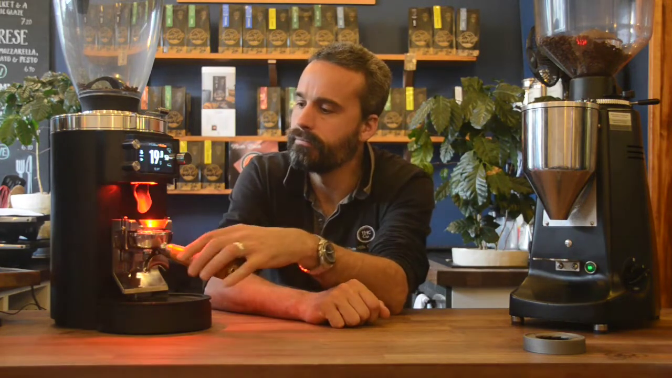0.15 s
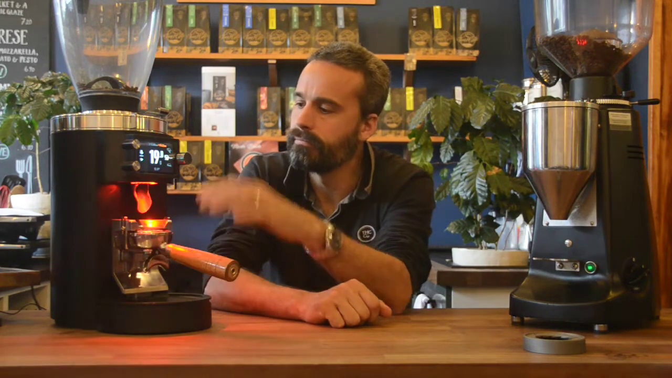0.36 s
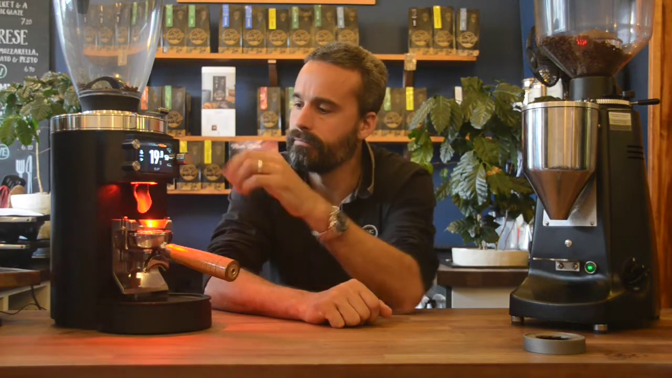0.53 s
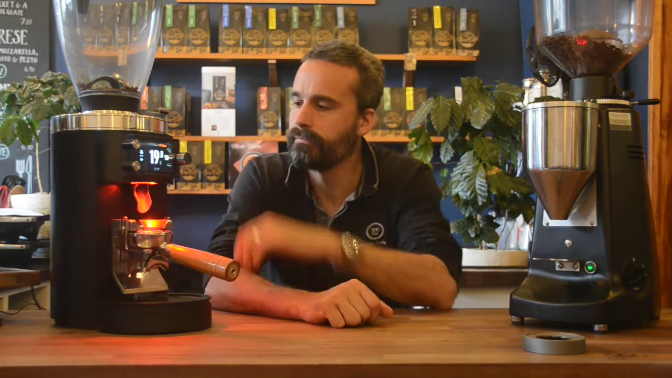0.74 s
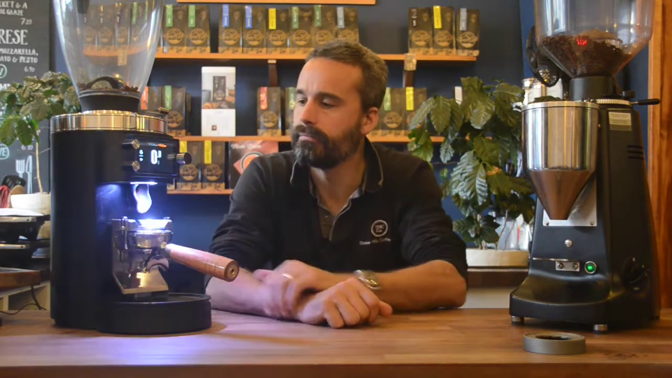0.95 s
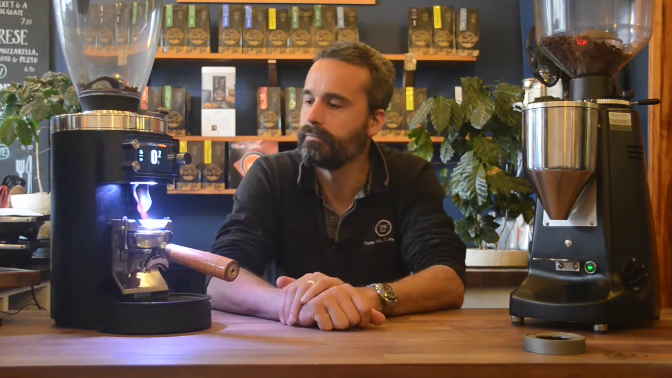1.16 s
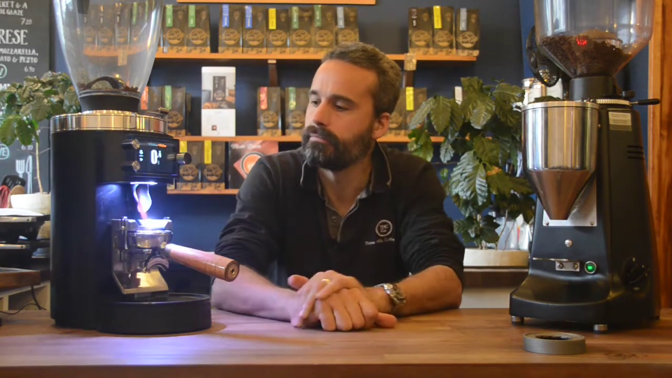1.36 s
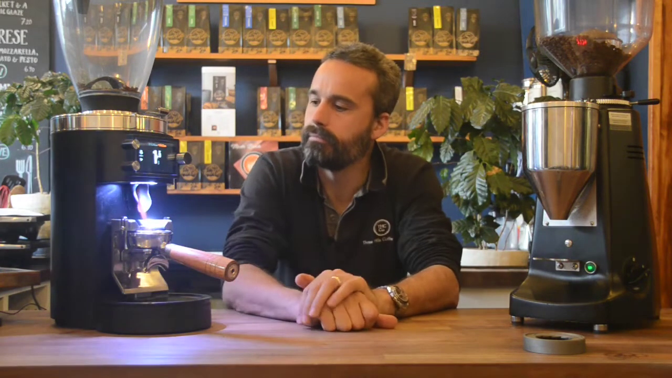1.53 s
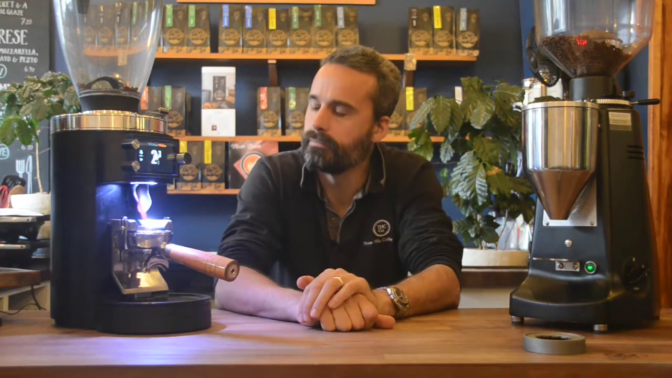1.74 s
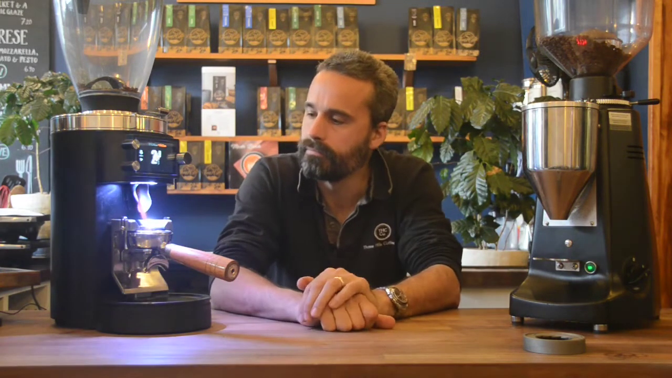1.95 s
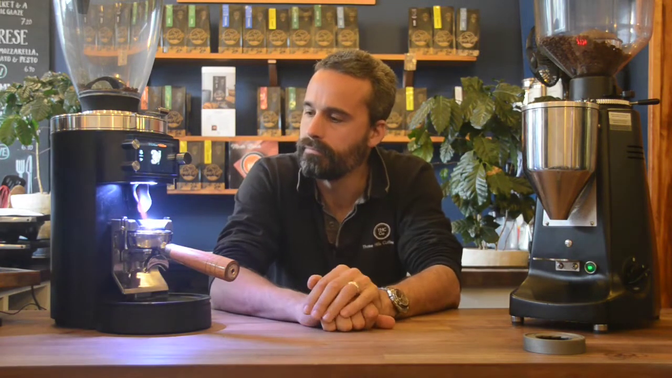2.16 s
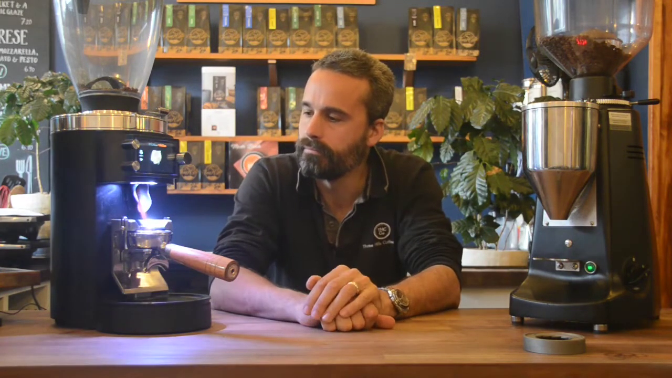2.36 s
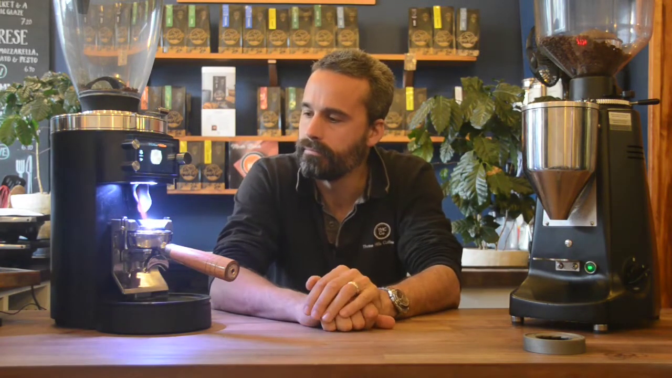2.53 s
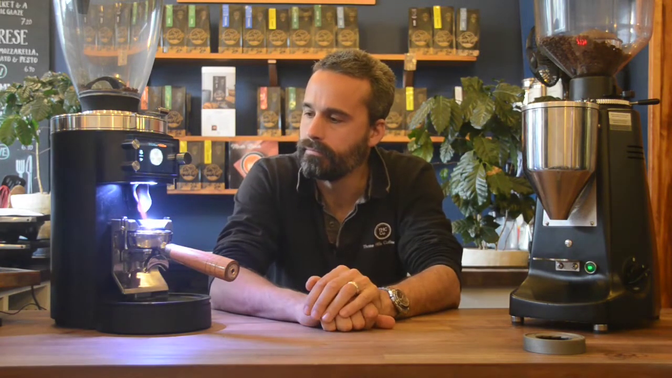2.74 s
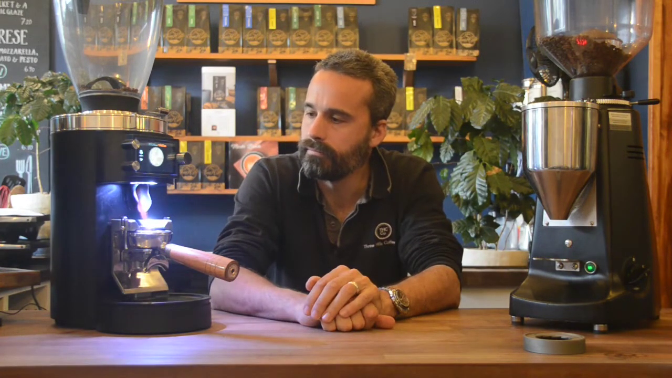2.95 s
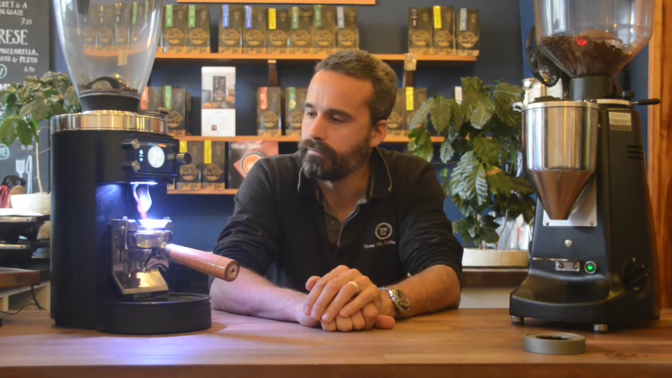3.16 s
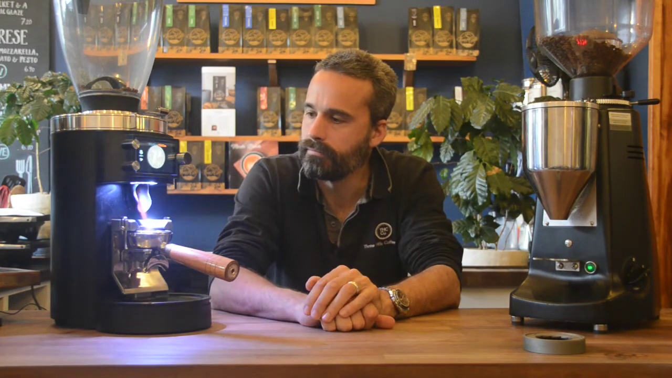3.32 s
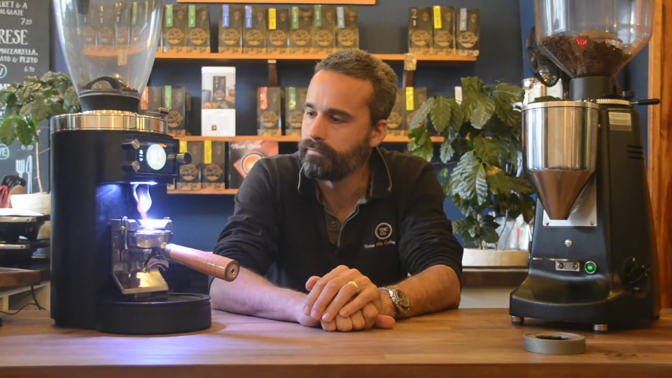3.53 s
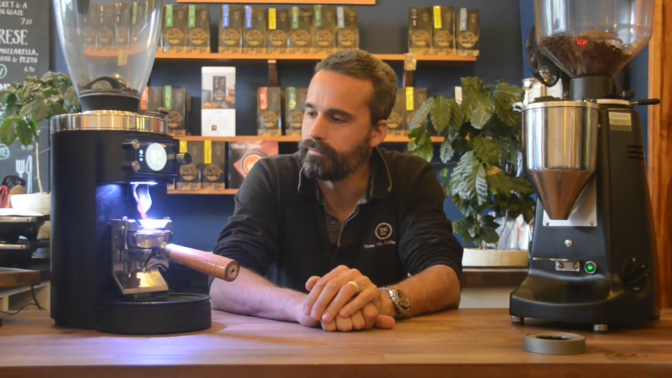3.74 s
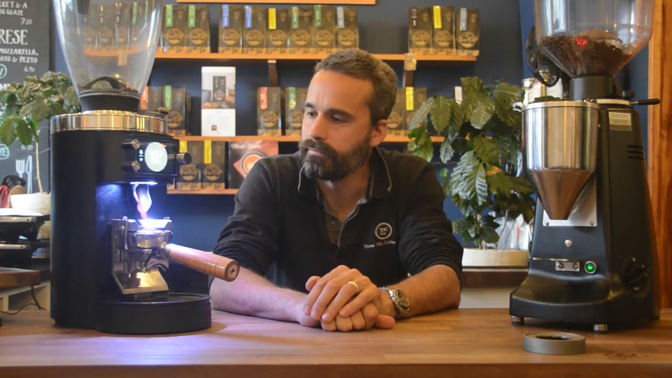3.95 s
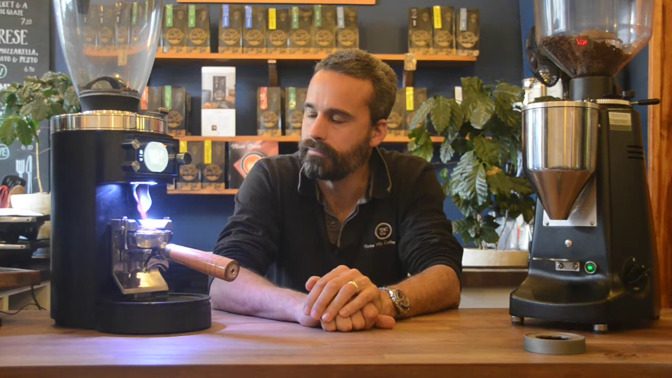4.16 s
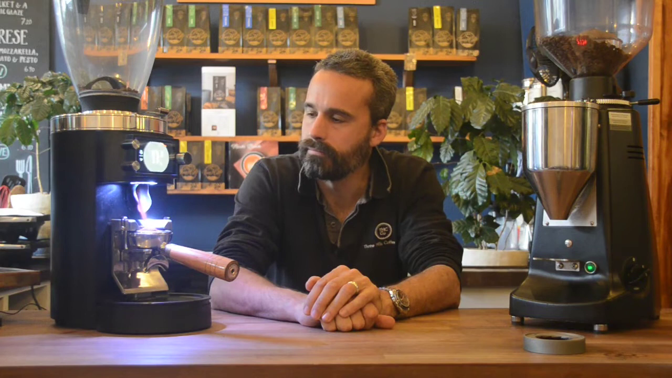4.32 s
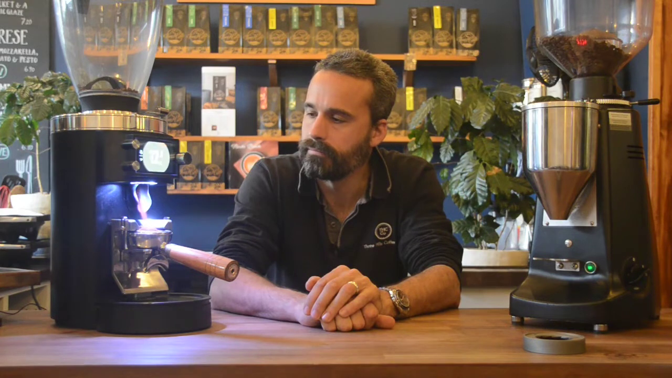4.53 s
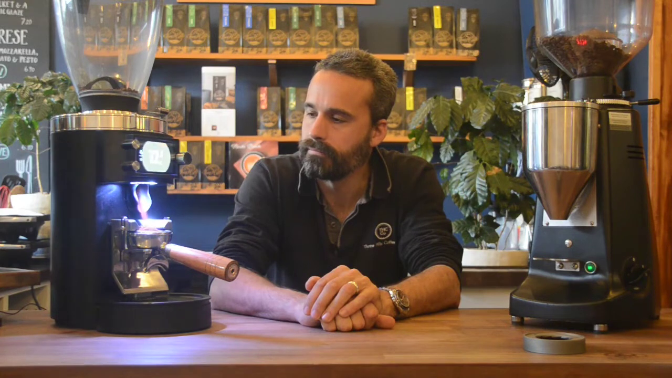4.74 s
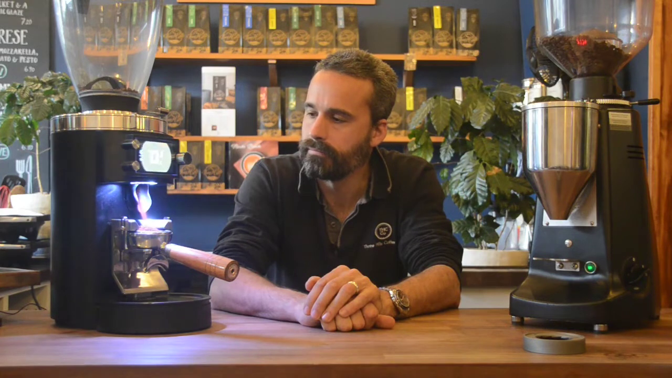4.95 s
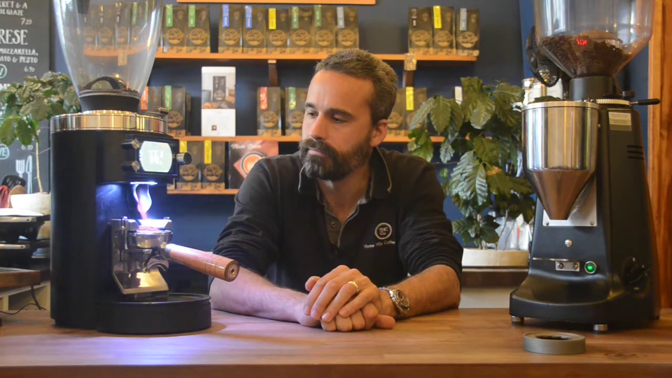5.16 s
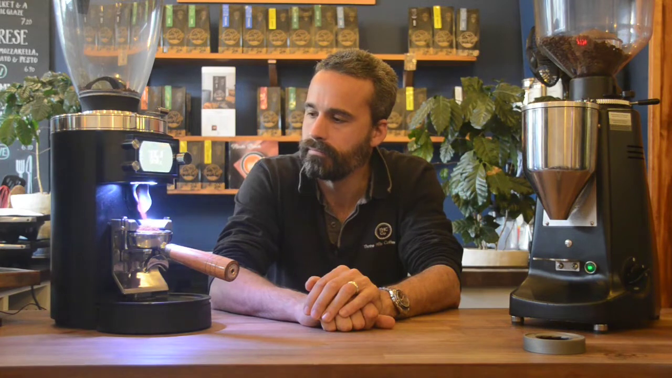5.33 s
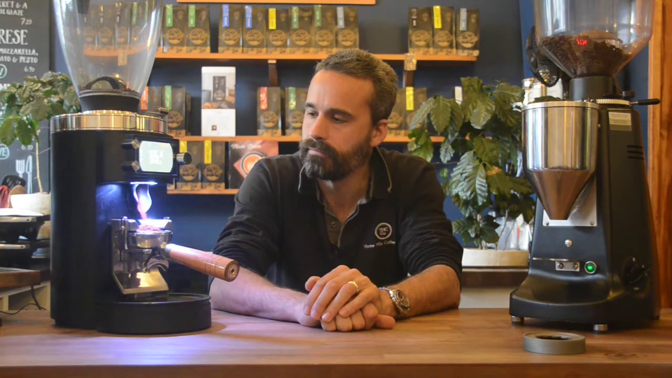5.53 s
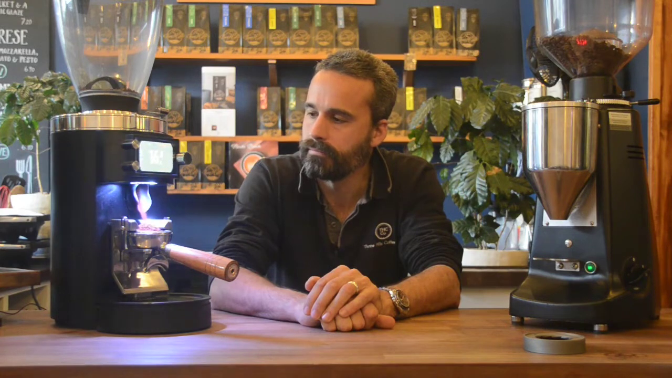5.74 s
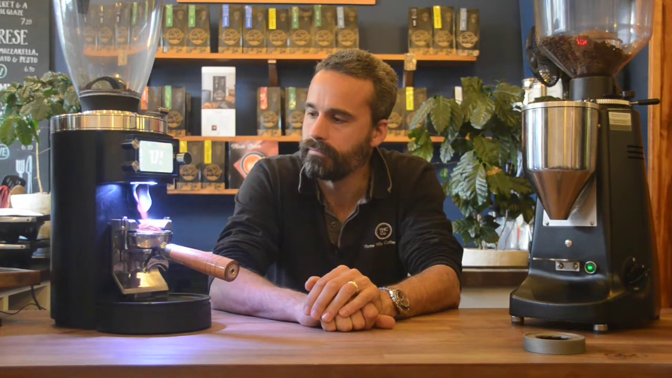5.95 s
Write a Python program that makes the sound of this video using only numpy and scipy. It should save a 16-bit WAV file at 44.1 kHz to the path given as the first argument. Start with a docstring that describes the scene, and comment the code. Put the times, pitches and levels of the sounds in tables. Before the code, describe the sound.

Less than a second of quiet refrigerator hum and low drone, with one tiny dull tick, precedes a sudden grinder start: click, knocking jolt, low shudder. Beans crack between the burrs as a continuous rough, buzzing crunch over a steady electric hum, with two sharp early snaps and small flutters in the growl. It never stops. Nearby single microphone in a lightly reverberant shop.

```python
"""A refrigerator's tones and soft air noise fill a shop throughout; a low drone sets in and holds;
a faint dull tick falls as it rings up once. An electric espresso grinder clicks on with a jolt and a shudder.
The motor settles to a steady hum of mains and rotor sine tones, with faint singing tones of the burrs.
Beans crack between the turning burrs: random impulses, in bites as the teeth pass, excite the resonances
of base, housing, grinding chamber and steel. Two beans snap sharply soon after the start."""
import sys
import numpy as np
from scipy import signal
from scipy.fft import rfft, irfft, next_fast_len
from scipy.io import wavfile
from scipy.ndimage import uniform_filter1d, map_coordinates

SR = 44100
rng = np.random.default_rng(int(sys.argv[2]) if len(sys.argv) > 2 else 0)


def unload_wav(signal):
    """Save mono or channel-first audio to the path in sys.argv[1] as 16-bit WAV at rate SR, clipped to [-1, 1]."""
    wavfile.write(
        sys.argv[1],
        SR,
        np.round(np.clip(np.atleast_2d(signal).T, -1, 1) * 32767).astype(np.int16),
    )


N = 268569
TIME = np.arange(N) / SR
START = 0.8405  # the motor switches on (s)

# relative spectrum of a sharp crack or click: frequency_hz, density_db (dB per Hz)
SNAP_COLOUR = [(500, -17), (1500, -1), (3000, -1), (4300, 0), (5700, -14), (7000, -21), (11000, -19),
               (15500, -29)]


def amp(db):
    """Decibels express the logarithm of an amplitude ratio; this is the ratio."""
    return 10 ** (np.asarray(db) / 20)


def unit(x):
    """Dividing by the root mean square gives x unit rms."""
    return x / np.sqrt(np.mean(x ** 2) + 1e-20)


def even(x, seconds):
    """Dividing by the running rms holds x near rms 1 over stretches of this length."""
    mean_square = np.abs(uniform_filter1d(x ** 2, int(seconds * SR)))
    return x / np.sqrt(mean_square + 1e-12)


def along(points, hz):
    """Linear interpolation of (Hz, value) points on a logarithmic frequency axis."""
    f, v = np.transpose(points)
    return np.interp(np.log(hz + 1), np.log(f + 1), v)


def wobble(rate):
    """Slow fluctuation: a spline through random knots, rate of them a second."""
    knots = rng.standard_normal(int(N * rate / SR) + 4)
    return map_coordinates(knots, [TIME * rate])


def rise(seconds, start=START):
    """Exponential approach from 0 at the start to 1, with this time constant."""
    return 1 - np.exp(-np.maximum(TIME - start, 0) / seconds)


def swell(at, seconds):
    """A Gaussian envelope of height 1, falling to 1/e this long before and after its middle."""
    return np.exp(-((TIME - at) / seconds) ** 2)


def coloured(x, gain, size=16384):
    """Minimum-phase filtering: a folded cepstrum turns a gain at each frequency into a causal response."""
    log_gain = np.log(np.maximum(gain(np.fft.rfftfreq(size, 1 / SR)), 1e-6))
    cepstrum = irfft(log_gain)
    cepstrum[1:size // 2] *= 2
    cepstrum[size // 2 + 1:] = 0
    response = irfft(np.exp(rfft(cepstrum)))
    return signal.fftconvolve(x, response)[:N]


def ring(x, modes):
    """Modal resonance: x excites a body whose steep-sided resonances add in power."""
    def gain(hz):
        # each resonance is 9 dB down at its width to either side
        return np.sqrt(sum(amp(db) ** 2 / (1 + ((hz - centre) / width) ** 2) ** 3
                           for centre, width, db in modes))
    return coloured(x, gain)


def noise(spectrum):
    """Spectral shaping: white noise filtered to this spectrum, at rms 1."""
    return unit(coloured(rng.standard_normal(N), lambda hz: amp(along(spectrum, hz))))


def tones(lines, drift, waver_db):
    """A line spectrum: sines that wander in phase (drift, rad) and strength (waver_db)."""
    total = 0
    for hz, db in lines:
        phase = 2 * np.pi * (hz * TIME + rng.random()) + drift * wobble(2.88)
        total = total + np.sqrt(2) * amp(db + waver_db * wobble(6)) * np.sin(phase)
    return total


def in_shop(x, wet_db):
    """Reverberation: counter and shelves answer with a noise tail that dies faster in the treble."""
    # decay of the tail: frequency_hz, t60_s
    shop_decay = [(150, 0.98), (1500, 0.34), (12000, 0.31)]
    hz, t, z = signal.stft(rng.standard_normal(SR // 2), SR, nperseg=256)
    decay = amp(-60 * t / along(shop_decay, hz)[:, None])
    tail = signal.istft(z * decay, SR, nperseg=256)[1]
    delayed = np.pad(tail / np.linalg.norm(tail), (SR // 300, 0))  # about 3 ms late
    return x + amp(wet_db) * signal.fftconvolve(x, delayed)[:N]


def crack(s, peak_db, colour):
    """Impulsive radiation: noise dying exponentially (3 ms time constant), filtered to this colour."""
    t = np.arange(SR // 20) / SR
    burst = np.zeros(N)
    burst[round(s * SR):][:len(t)] = rng.standard_normal(len(t)) * np.exp(-t / 0.003)
    sound = coloured(burst, lambda hz: amp(along(colour, hz)))
    return amp(peak_db) * sound / np.abs(sound).max()


def room():
    """Superposition: the refrigerator's line spectrum over broadband air noise and a narrow-band drone."""
    # the refrigerator's tones: frequency_hz, level_db (rms)
    fridge_lines = [(100, -62), (213.5, -48), (258.4, -52), (301, -56), (426, -53), (500.6, -54),
                    (651.4, -58), (726.7, -63), (1593, -66), (2126, -70)]
    # relative spectra of air and drone: frequency_hz, density_db (dB per Hz)
    air_colour = [(15, -45), (30, -14), (90, -13), (165, -12), (215, -3), (300, -2), (370, -8), (520, -9),
                  (900, -18), (1400, -23), (2000, -29), (5000, -43), (15000, -58)]
    drone_colour = [(120, -22), (280, 1), (370, -6.5), (495, 3.5), (570, -4), (680, -1), (810, -1),
                    (950, -18), (2000, -33), (8000, -100)]
    # resonance of the drone's swell: frequency_hz, width_hz, level_db (relative)
    drone_mode = [(495, 22, 0)]
    air = amp(-42.5) * noise(air_colour)
    drone = amp(-43.5) * rise(0.04, start=0.14) * noise(drone_colour)
    ringing = even(ring(rng.standard_normal(N), drone_mode), seconds=0.06)
    drone_swell = amp(-38.5) * swell(0.485, 0.045) * ringing
    return tones(fridge_lines, drift=0.4, waver_db=3.0) + air + drone + drone_swell


def tick():
    """A short transient: a faint dull tick before the motor starts, with the shop's reverberation."""
    # one event: start_s, peak_db (before reverberation)
    tick_event = (0.4323, -44)
    # its relative spectrum: frequency_hz, density_db (dB per Hz)
    tick_colour = [(500, -6), (2000, 0), (4800, -3), (6200, -20), (15000, -28)]
    return in_shop(crack(*tick_event, tick_colour), wet_db=-6)


def motor():
    """Transient and steady response: click, jolt and shudder at run-up, then the hum of rotating parts."""
    # damped modes of the housing under the jolt: frequency_hz, level_db (peak, before onset), t60_s
    jolt_modes = [(350, -17.5, 0.15), (520, -8.5, 0.13), (700, -13.5, 0.083), (880, -16.5, 0.083)]
    # the frame's shudder, relative spectrum: frequency_hz, density_db (dB per Hz)
    shudder_colour = [(25, -31), (60, -12), (110, -16), (250, 0), (400, -6), (900, -32), (4000, -100)]
    # tones of the mains and of the slightly slower rotor: frequency_hz, level_db (rms)
    hum_lines = [(35, -65), (50, -76), (91.6, -57), (100.07, -40), (183.2, -49), (200.1, -56), (300.2, -40),
                 (1200.8, -35.5)]
    # faint singing tones of the turning burrs: frequency_hz, level_db (rms)
    whine_lines = [(984, -45.5), (1109.6, -41), (1139, -38), (1157, -48), (1390.4, -42.5), (1960, -46.5),
                   (2432, -47.5), (3127, -49)]
    click = crack(START, -30, SNAP_COLOUR)
    since = np.maximum(TIME - START, 0)
    ringing = sum(amp(db - 60 * since / t60) * np.sin(2 * np.pi * hz * since) for hz, db, t60 in jolt_modes)
    jolt = rise(0.0062) * ringing
    shudder = amp(-26) * noise(shudder_colour) * rise(0.01) * swell(START + 0.063, 0.054)
    hum = tones(hum_lines, drift=0.062, waver_db=0.1)
    whine = tones(whine_lines, drift=2.03, waver_db=2.5)  # less steady than the hum
    return click + jolt + shudder + (hum + whine) * rise(0.1)


def fractures(rate, spread_db):
    """Brittle fracture: random impulses, rate a second on average, of capped log-normal size, at rms 1."""
    happens = rng.random(N) < rate / SR
    size = amp(spread_db * np.minimum(rng.standard_normal(N), 2.3))
    return unit(happens * size * rng.choice([-1, 1], N))


def fed(level_db):
    """Amplitude modulation: a part's gain wanders about its steady level with the uneven feed."""
    return amp(level_db + 0.5 * wobble(3.964))


def level_changes_db():
    """Level fluctuation: Gaussian bumps and dips in decibels on the housing's growl and chamber's crunch."""
    # brief level changes of growl and crunch: middle_s, growl_change_db, crunch_change_db
    brief_changes = [(1.036, 4.5, 1), (1.307, 3, 1), (1.59, 8, -0.5), (1.966, 5.5, 0.5), (2.138, 3.5, 0),
                     (2.2, 3.5, 2), (2.355, 5, 0), (2.518, 3, -3.5), (2.648, 3, 0.5), (2.925, 3.5, 2),
                     (3.064, 4, 0.5), (3.755, 6, 1), (3.834, 6, 1.5), (3.921, 3.5, 0.5), (3.978, 5, 1),
                     (4.297, 4.5, -1.5), (4.525, 8, 0), (4.875, 2.5, 2), (5.51, 2, 2.5), (6.022, 5, 2.5)]
    # dips of the growl: middle_s, half_length_s, depth_db
    growl_dips = [(0.902, 0.022, 8), (1.091, 0.015, 9.5), (1.458, 0.083, 3.5), (2.805, 0.016, 7.5),
                  (5.08, 0.035, 7)]
    change_s = 0.021  # half length of a brief change
    growl = sum(db * swell(s, change_s) for s, db, _ in brief_changes)
    crunch = sum(db * swell(s, change_s) for s, _, db in brief_changes)
    dips = sum(db * swell(s, length) for s, length, db in growl_dips)
    return growl - dips, crunch


def over_basket(x):
    """Damping: the bare steel basket colours the grinding until grounds cover its floor."""
    # colouring by the empty basket: frequency_hz, gain_db
    basket_colour = [(4100, -0.5), (4500, -7.5), (5000, 2), (6400, 0), (7250, 2), (7850, -2.5), (8400, 2),
                     (9200, -1), (11450, 1), (11950, -4), (12450, 0), (13950, -3), (14600, 1)]
    covered_s = 1.75  # middle of the change
    bare = 0.5 - 0.5 * np.tanh((TIME - covered_s) / 0.13)
    return bare * coloured(x, lambda hz: amp(along(basket_colour, hz))) + (1 - bare) * x


def grinding():
    """Modal excitation: coarse, fine and powder fractures, in bites of the burr teeth, ring the parts."""
    # resonances of base on counter, housing, chamber and steel: frequency_hz, width_hz, level_db (relative)
    base_modes = [(121, 51, -22.5), (255.2, 21.3, 1.5), (296, 15.6, -3), (325, 148, -12.5)]
    housing_modes = [(436, 128, -36.5), (515.7, 49.4, -9.5), (540.1, 14.9, 1.5), (558.3, 47.7, -2),
                     (674.6, 73, -12.5), (790, 26, -20.5)]
    chamber_modes = [(856, 74, -18), (1169, 207, -9.5), (1204.4, 19, -4), (1444, 130, -18),
                     (1544, 58, -6.5), (1621.6, 44, -0.25), (1688, 70, -2.5), (1805, 67, -17),
                     (2023, 210, -19), (2469, 220, -15.5), (2840, 125, -23.5), (3050, 610, -20),
                     (4048, 410, -24.5), (4483, 290, -24.4), (5153, 303, -28.5)]
    burr_modes = [(6277, 226, -2), (6473, 190, -1.5), (7120, 234, -18.5), (7755, 530, -15.5),
                  (9530, 1060, -18.5), (10830, 824, -22), (11820, 320, -18.5), (12900, 630, -21),
                  (13900, 658, -22.5), (15418, 341, -33)]
    growl_db, crunch_db = level_changes_db()
    shaft_hz = 22.9
    turn = 2 * np.pi * shaft_hz * TIME + 0.9 * wobble(5.4)
    teeth = np.sin(4 * turn)  # four bites a turn
    bite_db = 0.5 * np.sin(turn) + 0.5 * teeth + 0.32 * wobble(60) + 0.75 * wobble(260)
    bite = amp(bite_db)
    coarse = bite * fractures(rate=1800, spread_db=3)
    fine = bite * fractures(rate=9000, spread_db=3.5)
    powder = bite * fractures(rate=12000, spread_db=2)
    base = even(in_shop(ring(coarse + 0.86 * fine, base_modes), wet_db=-15.5), seconds=0.23)
    housing = even(in_shop(ring(coarse + 0.8 * fine, housing_modes), wet_db=-16.0), seconds=0.1)
    chamber = even(in_shop(ring(coarse + 1.01 * fine, chamber_modes), wet_db=-11.5), seconds=0.12)
    steel_drive = 0.65 * coarse + fine + 0.5 * powder
    steel = even(in_shop(ring(steel_drive, burr_modes), wet_db=-12.5), seconds=0.24)
    # the body shakes at once; the burrs need a moment to catch the beans
    body = (amp(-30.5) * base + fed(-17.5 + growl_db) * housing) * rise(0.012)
    crunch = (fed(-19 + crunch_db) * chamber + fed(-31) * steel) * rise(0.013) ** 2
    return body + over_basket(crunch)


def snaps():
    """Sudden fracture: beans that snap sharply stand out as short cracks, with the shop's reverberation."""
    # sharp snaps: start_s, peak_db (before reverberation)
    snap_events = [(0.9023, -13.5), (1.0067, -13.5)]
    return in_shop(sum(crack(s, db, SNAP_COLOUR) for s, db in snap_events), wet_db=-6)


def scene():
    """Superposition: the pressures of room and grinder add at one microphone."""
    return (room() + tick() + motor() + grinding() + snaps())[None]


def record(dry):
    """Band limiting: every spectral component from the limit upward is removed."""
    top_hz = 15730
    size = next_fast_len(N + SR // 2)
    kept = np.fft.rfftfreq(size, 1 / SR) < top_hz
    return irfft(rfft(dry, size) * kept, size)[:, :N]


dry = scene()
out = record(dry)
unload_wav(out)
```